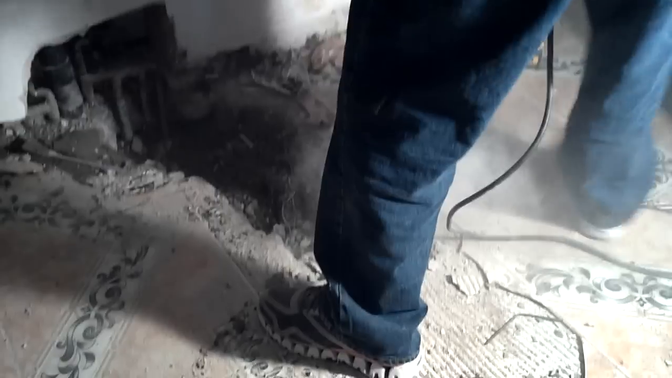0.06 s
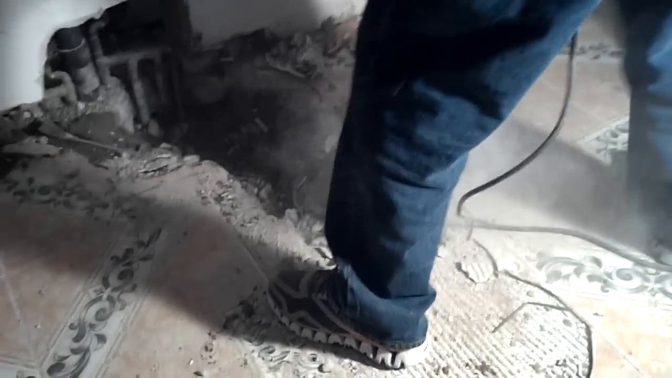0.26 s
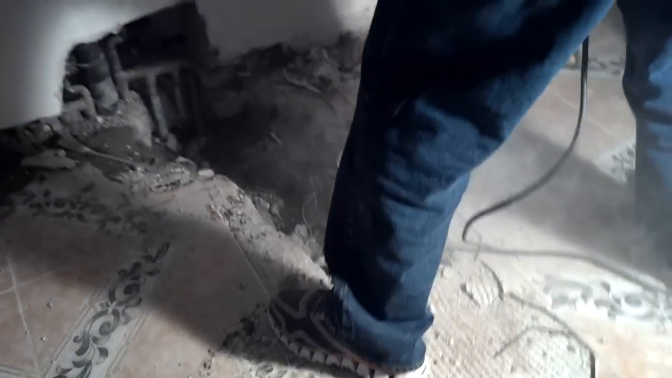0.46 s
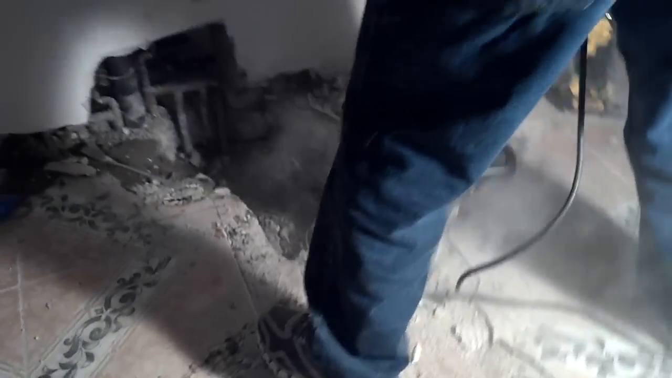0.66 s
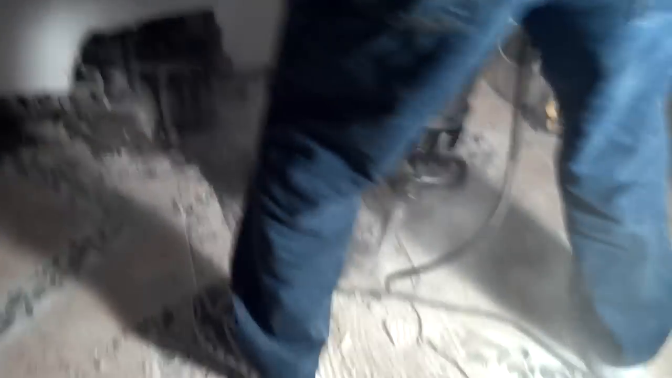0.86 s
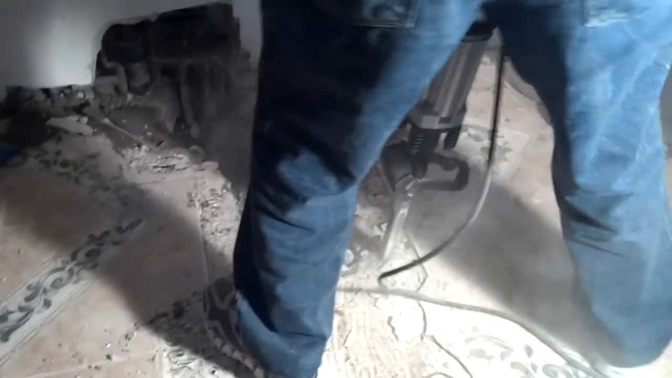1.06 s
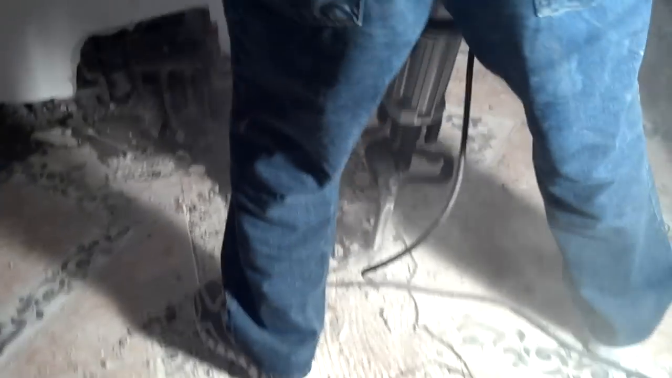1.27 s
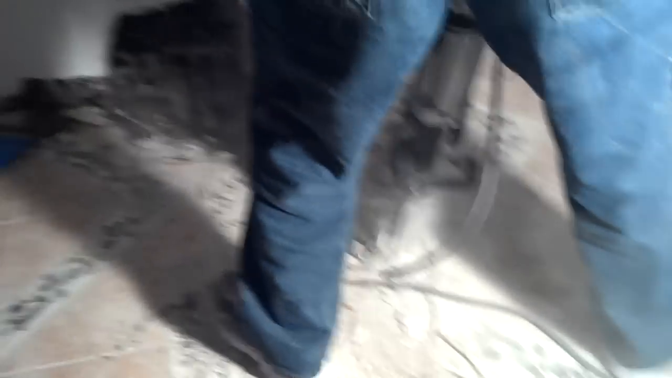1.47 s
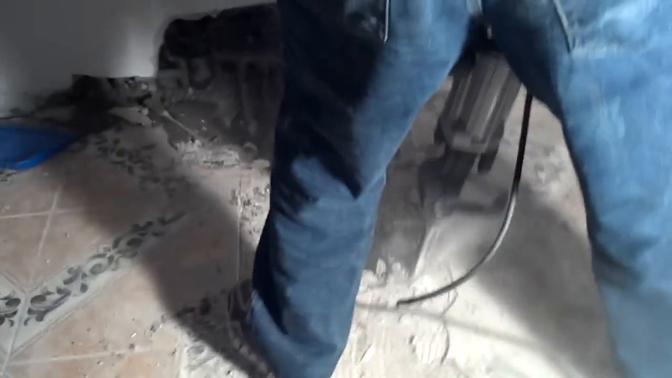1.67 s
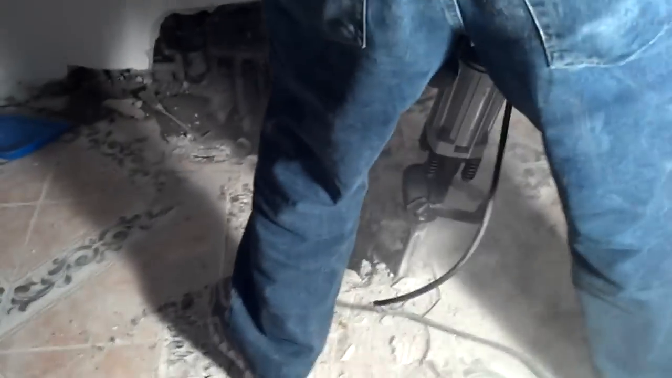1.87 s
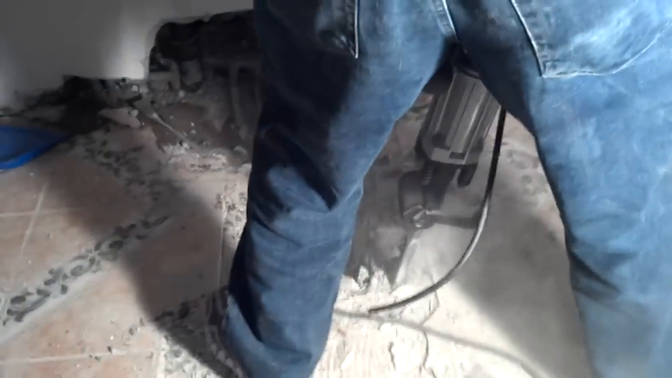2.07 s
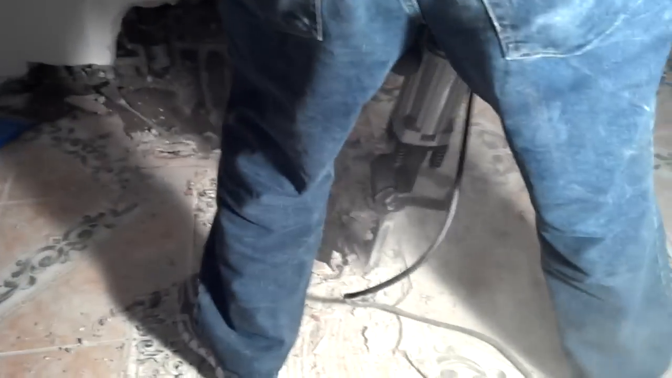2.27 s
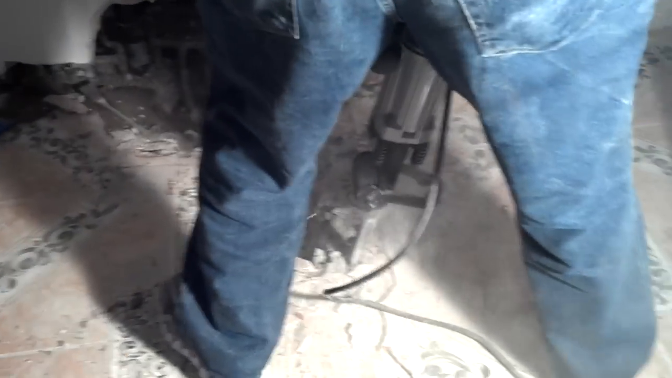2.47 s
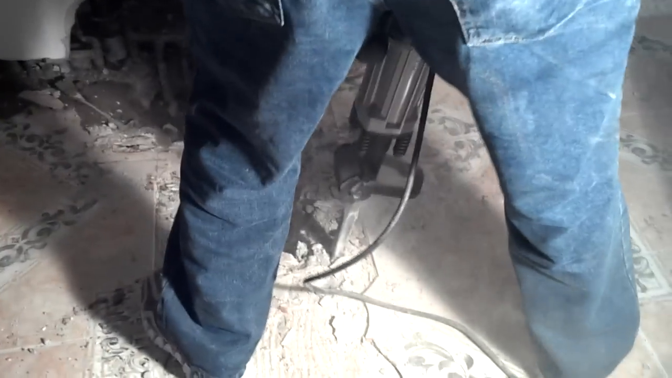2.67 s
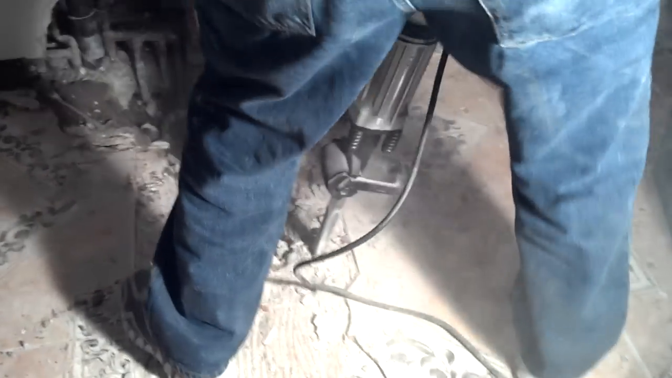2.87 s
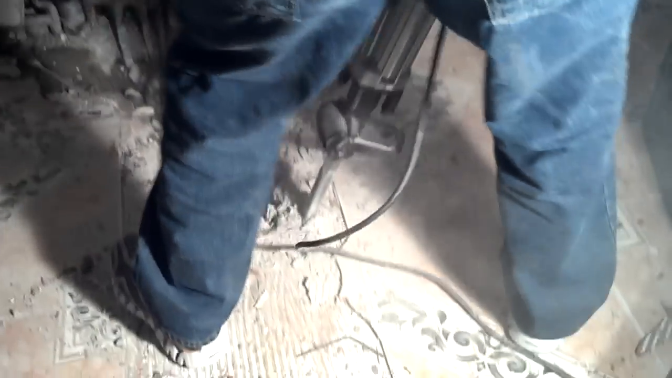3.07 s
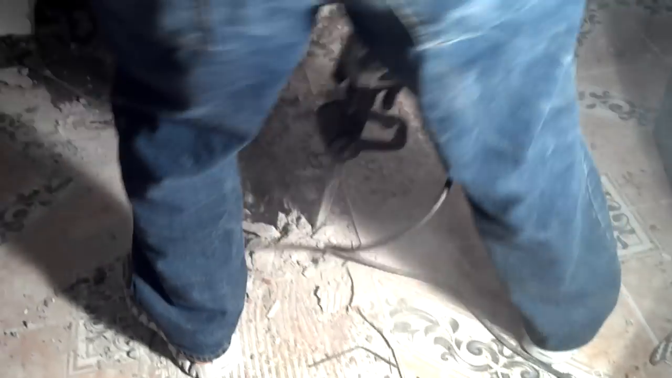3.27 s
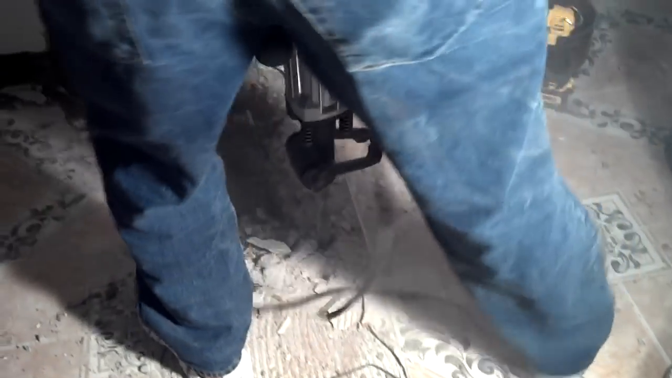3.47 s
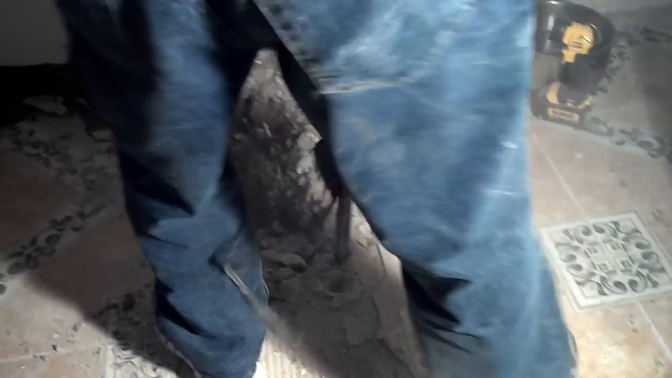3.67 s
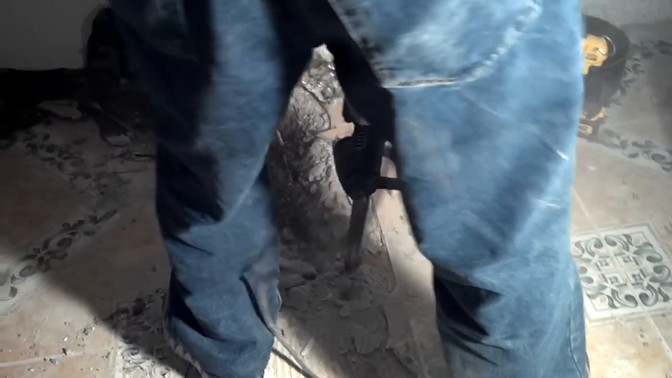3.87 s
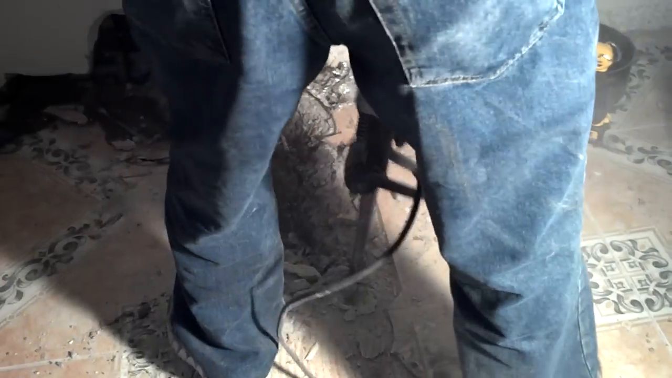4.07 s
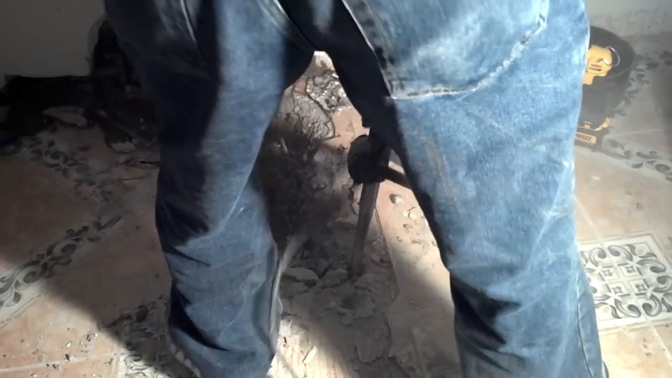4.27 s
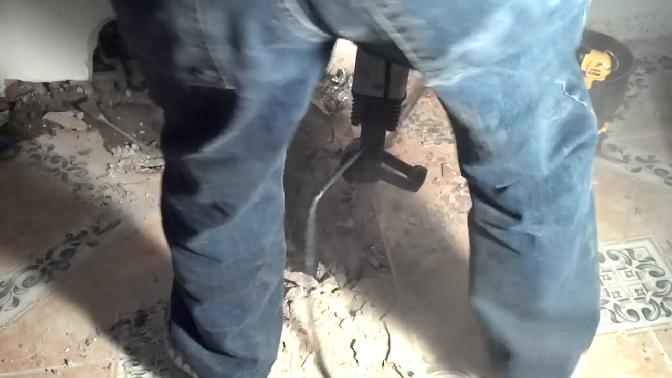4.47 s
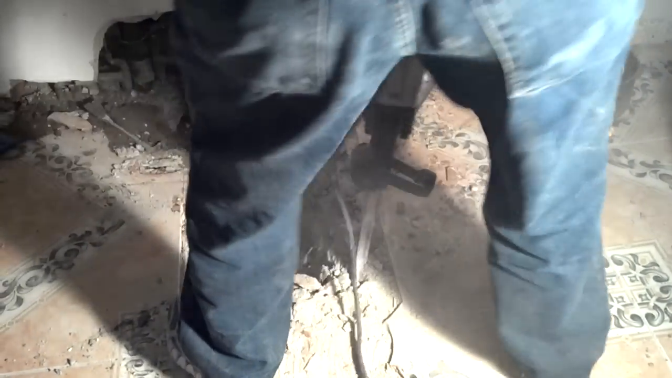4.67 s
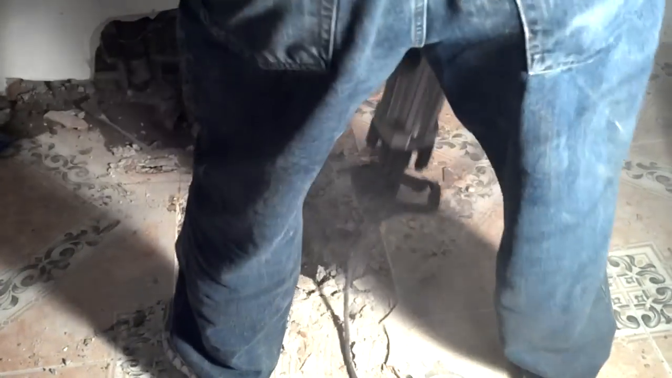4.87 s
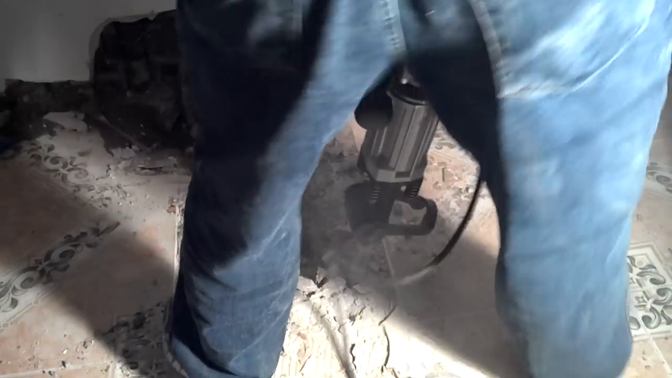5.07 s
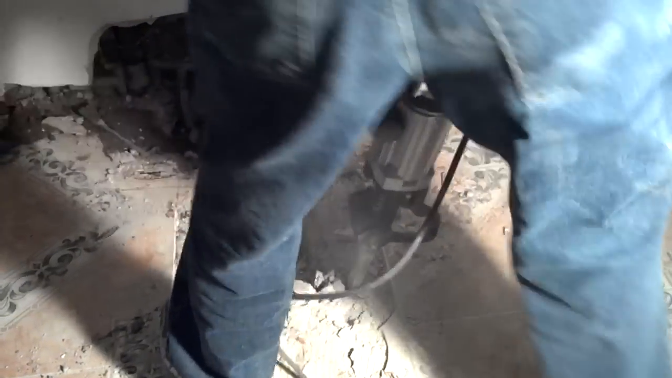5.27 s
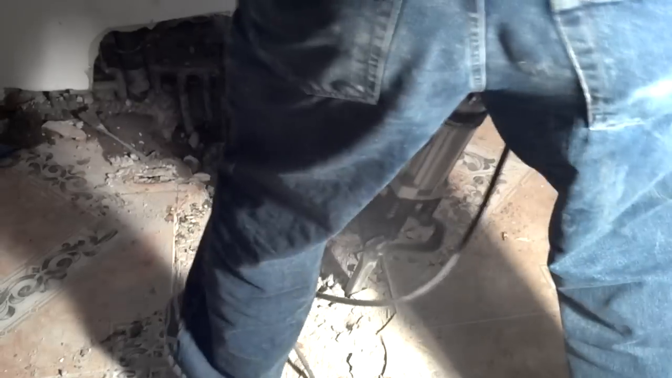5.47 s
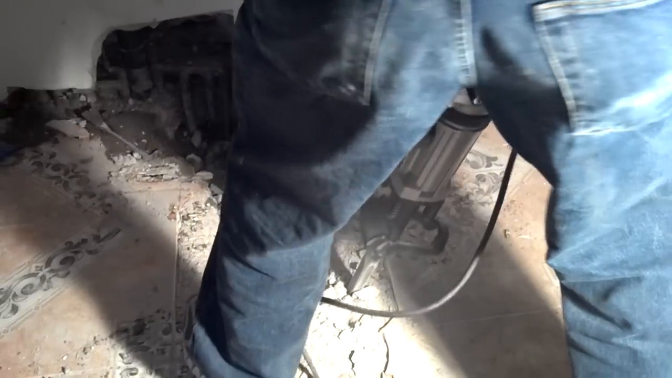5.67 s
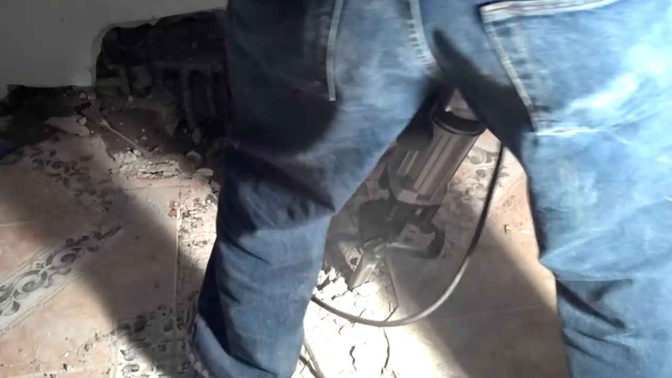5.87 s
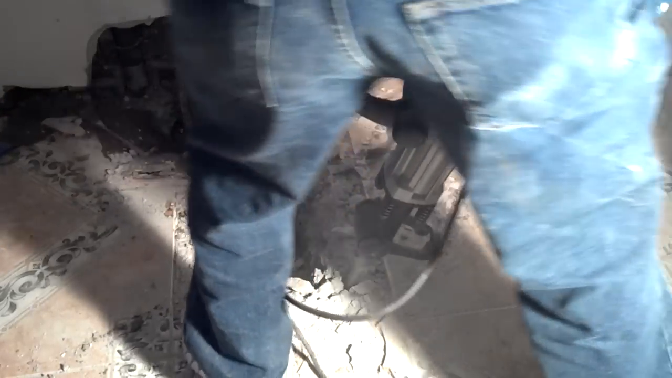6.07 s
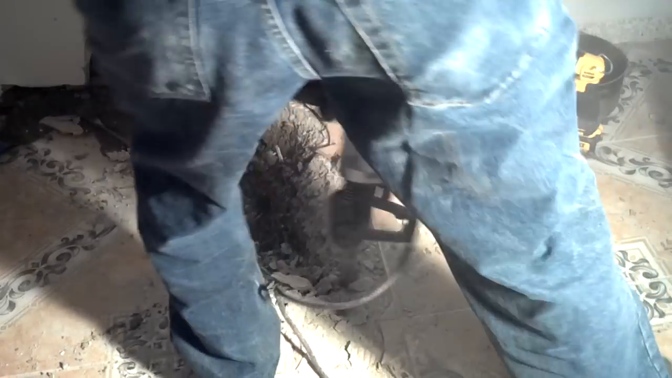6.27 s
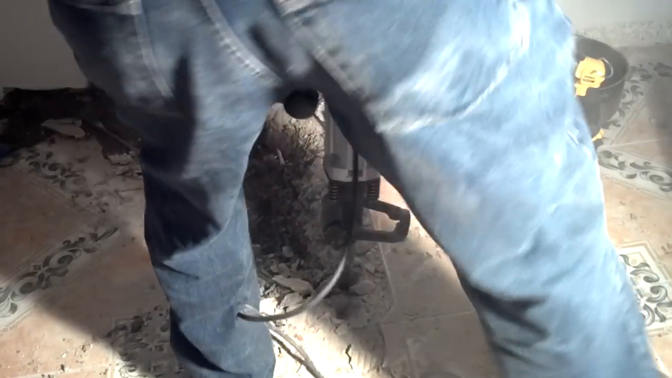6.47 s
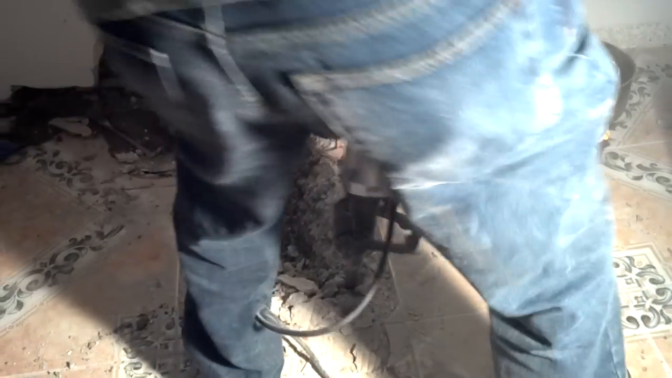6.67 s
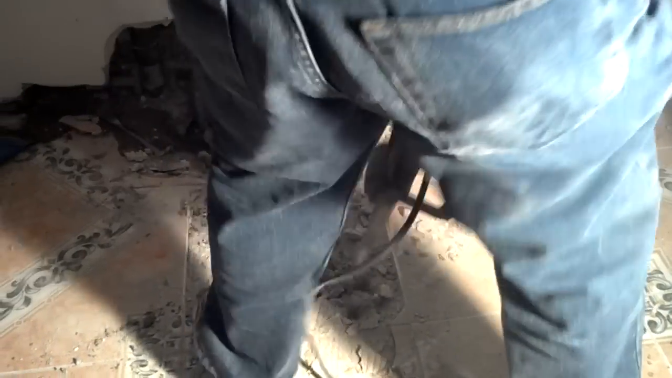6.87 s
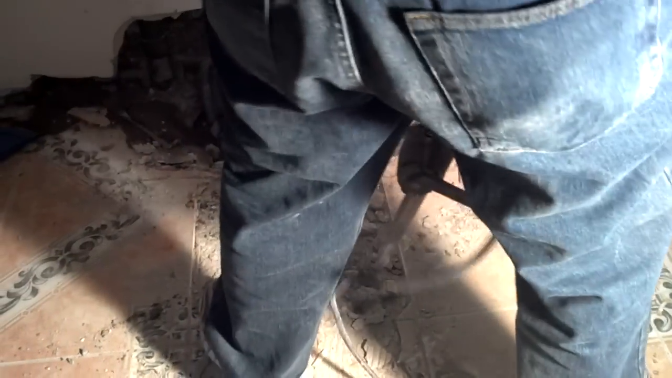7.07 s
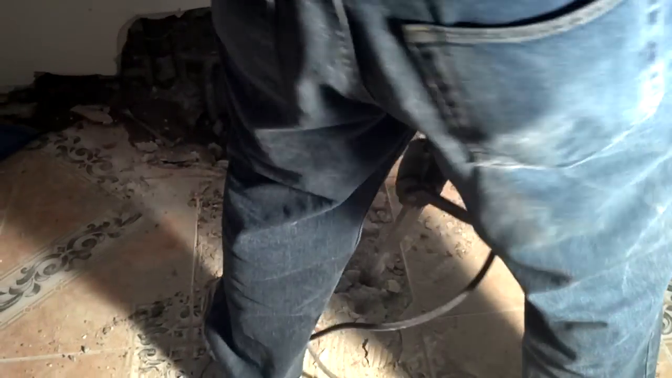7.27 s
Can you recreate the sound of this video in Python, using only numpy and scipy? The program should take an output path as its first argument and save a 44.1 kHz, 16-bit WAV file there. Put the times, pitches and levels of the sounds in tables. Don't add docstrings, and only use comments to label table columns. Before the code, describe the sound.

From the start, a corded electric demolition hammer is already pounding a tiled concrete floor very close by, about 21 to 23 blows a second. Each blow combines a slab thump, a brittle tile crack and a bright steel ring; the chisel skids and sings repeatedly until about 1.75 s, then less often as the blows sit deeper. Fan and brush noise rushes underneath, and bare walls return short, hard echoes. Hammering stops at about 3.5 s, and a thin gear whine climbs over the motor rush. A light blow at 4.2 s leads into renewed hammering from 4.3 s, near 30 blows a second, duller and gritty in rubble, slowing towards 21 with sharper ticks and more rattling steel by 6.1 s. A pause follows, with another rising whine from 6.3 s and scattered knocks between 6.7 and 6.9 s; motor rush continues to about 7.3 s. Low handling bumps jolt the small handheld stereo microphone.

```python
import sys
import numpy as np
from scipy import signal
from scipy.fft import rfft, irfft, next_fast_len
from scipy.io import wavfile
from scipy.ndimage import uniform_filter1d, map_coordinates

SR = 44100
rng = np.random.default_rng(int(sys.argv[2]) if len(sys.argv) > 2 else 0)


def store_wav(level_fs):
    pcm = np.round(np.clip(np.atleast_2d(level_fs), -1, 1) * 32767)
    wavfile.write(sys.argv[1], SR, pcm.T.astype(np.int16))


def how_loud(loudness_db):
    steps = np.asarray(loudness_db, float) / 20
    return 10 ** steps


N = 322792
RUBBLE_S = 4


def along(points, hz):
    f, v = np.transpose(points)
    return np.interp(np.log(hz + 1), np.log(f + 1), v)


def over_time(points):
    return np.interp(np.arange(N) / SR, *np.transpose(points))


def drift(samples):
    return map_coordinates(rng.standard_normal(N // samples + 4), [np.arange(N) / samples])


def unit(x):
    return x / np.sqrt(np.mean(x ** 2) + 1e-20)


def filtered(x, response):
    m = next_fast_len(N + SR // 2)
    return irfft(rfft(x, m) * response(np.fft.rfftfreq(m, 1 / SR)), m)[..., :N]


def peak(f, hz, width):
    return 1j * f * width / (hz * hz - f * f + 1j * f * width)


def modes(table):
    return lambda f: sum((-1) ** k * how_loud(db) * peak(f, hz, w) for k, (hz, w, db) in enumerate(table))


def noise(spectrum):
    return unit(filtered(rng.standard_normal((2, N)), lambda hz: how_loud(along(spectrum, hz))))


def strokes(seconds, db):
    return np.bincount(np.round(seconds * SR).astype(int), how_loud(db), N + SR)[:N]


def fading(x, t60, rise):
    t = np.arange(SR // 2) / SR
    return np.abs(signal.fftconvolve(x, how_loud(-60 * t / t60) * (1 - np.exp(-t / rise)))[:N])


def motor():
    # time in seconds, level in dB.
    rush_level = [(0.0, -22.5), (0.85, -31), (1.65, -29), (2.16, -25), (2.59, -27.5), (2.93, -22),
                  (3.28, -26.5), (3.4, -21), (3.55, -29.5), (3.79, -30.5), (4.18, -27.5), (4.56, -27),
                  (5.5, -26.5), (5.73, -30), (6.03, -28), (6.25, -31.5), (6.71, -27.5), (7.32, -25)]
    # frequency in Hz, level in dB per Hz.
    rush_colour = [(60, -17), (150, -19), (330, 2.5), (600, -3), (1000, -1.5), (1500, -1), (2200, 3),
                   (3500, -2.5), (5200, -11.5), (6300, -9.5), (8500, -12.5), (11000, -22), (14000, -25),
                   (15800, -42)]
    # start in seconds, end in seconds, first pitch in Hz, idle pitch in Hz, level in dB.
    whines = [
        (3.58, 4.6, 3560, 4380, -37.5),
        (6.34, 6.9, 3570, 4280, -36),
    ]
    spin_up_s, rise_s, fade_db_per_s = .33, .07, 8
    t = np.arange(N) / SR
    sound = how_loud(over_time(rush_level) + 0.5 + 1.3 * drift(900)) * noise(rush_colour)
    for start, end, first_hz, idle_hz, db in whines:
        since = np.clip(t - start, 0, None)
        hz = idle_hz - (idle_hz - first_hz) * np.exp(-since / spin_up_s)
        waver = 8 * drift(700)
        swell = (t < end) * (1 - np.exp(-since / rise_s))
        swell = swell * how_loud(db - fade_db_per_s * since + 0.075 * waver)
        phase = 2 * np.pi * np.cumsum(hz + waver) / SR
        sound += swell * np.array([np.sin(phase), .6 * np.cos(phase)])
    return sound


def blows():
    # time in seconds, slab accent in dB,
    # tile accent in dB, steel accent in dB.
    on_tile = [(0.0236, 4, -2, -1), (0.0688, 1.5, -4, -0.5), (0.1129, 2.5, 8, 0), (0.157, 0, -5, -2),
               (0.2021, 3, -3, 1.5), (0.2441, 1.5, -4, 2), (0.2891, 6, 5, -3), (0.334, 3, -4, 0),
               (0.3761, 2.5, 2, 0), (0.422, 4, 1, 3.5), (0.4671, 0, -3, 0.5), (0.513, 1, -1, -3),
               (0.5584, 3, -0.5, -3.5), (0.6049, 3, 1.5, -3.5), (0.6513, -4.0, -0.5, -1.5),
               (0.6993, 2, -1.5, -2), (0.7448, 2.5, -3, -3), (0.7932, 4.5, -1, -3), (0.84, 2.5, -2, -1),
               (0.8864, 4.5, -4.5, -3), (0.9337, 4.5, -2.5, -3), (0.982, 1.5, 0, 2.5),
               (1.0267, 3.5, -4, -1.5), (1.0773, 4, 1.5, -2), (1.1234, 3.5, 1, -1.5),
               (1.1691, 5.5, 1.5, -7), (1.2172, 3, -2, -3), (1.2638, 1, 2.5, 0.5), (1.3113, 3.7, 0.5, -1),
               (1.3567, -0.5, 1.5, 3), (1.4064, 0.5, -1, 3), (1.4509, -3, 1, 2), (1.4961, -1.5, 0, 9.5),
               (1.541, 1, 0.5, -3), (1.5874, 3.5, 4, -3), (1.634, 2.5, 1, 1), (1.6801, 4, 3, -1),
               (1.7281, 2, 2, 0.015), (1.7747, -0.5, 0.5, 0.0012), (1.8223, -0.5, -1, 0),
              (1.8693, 2.5, 0, 0.0028), (1.9149, 0.5, 5.5, 0.016), (1.961, -0.5, 1.5, 0.0067),
              (2.007, 0.7, 1, 0.001), (2.0537, 5, -4, 0.0), (2.0999, 3.5, -2, 0.0041),
              (2.1459, 3, 3.5, 0.0), (2.193, 1.5, -3, 0.016), (2.2403, 0, 1.5, 0.041),
              (2.2867, 0.5, -1, 0.0), (2.3325, 0, -1, 0.0), (2.3783, 5, -1, 0.0031), (2.4255, 3, 0, 0.0053),
              (2.4724, 5, -9, 0.0), (2.5191, -0.5, -2, 0.0026), (2.5658, 1.3, -4.5, 0.0),
              (2.6125, -1.5, -2, 0.0014), (2.6592, 1, -0.5, 0.0026), (2.7059, 1.5, 0.5, 0.0047),
              (2.752, 0.5, 1, 0.0), (2.8004, 1.5, 2.5, 0.011), (2.8462, 1.5, -1, 0.0041),
              (2.8948, -0.5, -5, 0.0), (2.9414, 2.5, -1, 0.0), (2.9897, 1, 0, 0.0076),
              (3.0379, 2, -2.5, 0.0), (3.0848, 2, 0, 0.0), (3.133, 3, -1, 0.012), (3.1808, -1, -3.5, 0.0),
              (3.23, 0, -2, 0.0), (3.2786, 0, -2, 0.0), (3.3284, 7, 2.5, 0.022), (3.378, -9, -2.5, 0.019),
              (3.4286, 6, -7, 0.0053)]
    in_rubble = [(4.2996, -0.0, 0, 0.1), (4.3344, -8, -0.5, 0.3), (4.3706, 2, 2.7, 0),
                 (4.406, -2, -1.5, -3), (4.439, -7, -3, 3), (4.4717, -3, 1, -0.1), (4.5051, 0.5, 3.5, -1),
                 (4.539, 0, 0, 2.2), (4.5727, -1.5, 2, -2), (4.6058, -1.1, 0, -2), (4.6384, 1, -3, -2.3),
                 (4.6717, 0, 0, -4), (4.7056, 1.5, 2, -2), (4.7395, 0, 3.5, -2), (4.7725, 0, 1, 8),
                 (4.8066, -2, 4, -7), (4.8399, -1, 1, 2), (4.8735, -1, 0, 3), (4.9073, -2, 2, 3),
                 (4.9405, -2, 2, 0), (4.9748, -1.5, 2, -2), (5.01, -2, -6, 1), (5.0435, -3, 2.5, -2),
                 (5.08, 0, 4.5, 1.6), (5.1139, -0.5, 3.5, 7), (5.147, -2, 5.5, 4), (5.1817, 4.5, -2.9, 0.5),
                 (5.2151, 3.5, -9, 1), (5.2496, -1.5, -5, 0), (5.2825, 0.5, 4.5, -1), (5.318, 0, -2, -1),
                 (5.3567, 1.5, 3.5, -5), (5.3925, 0.5, 0.5, -2), (5.4321, 0.5, -2, 2), (5.4735, 1, 3, 1.5),
                 (5.5136, 1.3, 2.5, 3), (5.5557, -0.6, 5.5, 1), (5.6004, -1, 0, -1), (5.6477, 0.5, 1.5, 0),
                 (5.6965, -1, -4, 1), (5.7439, 0.5, -1, 0.5), (5.7922, 2, -4, 2), (5.8402, 1.5, 1, 4.5),
                 (5.8896, 0, -1.5, 5), (5.9366, 3, 4, 6), (5.9873, 2, 7.5, 4), (6.035, 2, 5, 5),
                 (6.0833, 3, 6.5, 5), (6.133, 3.5, 7, 6)]
    # time in seconds, bite into the slab in dB, brittleness of the tile in dB, looseness of the steel in dB.
    seats = [
        [(0, -13, -29.5, -25), (.45, -14.5, -20.5, -28), (.75, -18.5, -16, -21.5), (1.15, -19.5, -21, -23),
         (1.45, -10.5, -21.5, -38), (1.9, -13, -23.5, -32), (2.9, -13, -16.5, -36), (3.28, -17.5, -15, -36),
         (3.43, -49, -15.5, -48)],
        [(4.3, -45, -25.5, -47.5), (4.42, -31, -18, -34), (4.52, -28, -20.5, -45), (4.8, -25, -22, -31),
         (5.0, -26, -22.5, -20), (5.15, -20, -21.5, -39), (5.3, -19.5, -18.5, -18.5), (5.75, -20.5, -19, -23),
         (6.13, -26.5, -23, -25.5)],
    ]
    # start in seconds, end in seconds, steel level in dB.
    skids = [(0, .09, -21), (.26, .3, -20), (.32, .4, -20), (.49, .72, -18), (.82, .9, -18.5),
             (.96, 1.05, -22), (1.24, 1.33, -23.5), (1.52, 1.75, -22.5), (1.85, 1.93, -26),
             (2.03, 2.07, -19.5), (2.08, 2.16, -27), (2.36, 2.49, -22.5), (4.96, 5.03, -29),
             (5.16, 5.23, -22)]
    # time in seconds, slab level in dB, tile level in dB, steel level in dB.
    strays = [
        (3.518, -25.5, -16, -67),
        (4.203, -42, -20, -36),
        (6.691, -35, -17.5, -21),
        (6.7237, -25, -21, -29),
        (6.762, -28, -15, -18),
        (6.797, -56, -26, -37),
        (6.856, -26, -27, -52.5),
    ]
    # slab in dB, tile in dB, steel in dB.
    scatter_db = (.4, .4, .6)
    skid_loss = 0.41
    rows = [np.array(strays)]
    for listed, seat in zip((np.array(on_tile), in_rubble), seats):
        s, *accent = np.transpose(listed)
        at, *seated = np.transpose(seat)
        bite, brittle, loose = (np.interp(s, at, v) for v in seated)
        skidding = [np.where((s > start) & (s < end), db, -120) for start, end, db in skids]
        steel = np.max([loose] + skidding, axis=0)
        force = np.array([bite - skid_loss * (steel - loose), brittle, steel]) + accent
        chance = scatter_db * rng.standard_normal((len(s), 3))
        rows.append(np.column_stack([s, force.T + chance]))
    rows = np.concatenate(rows)
    return rows[np.argsort(rows[:, 0])].T


def room_tail():
    # frequency in Hz, time to fall 60 dB in seconds.
    decay = [(150, 0.76), (500, 0.51), (1500, 0.073), (6000, 0.0069)]
    hz, t, z = signal.stft(rng.standard_normal((2, SR // 2)), SR, nperseg=256)
    tail = signal.istft(z * how_loud(-60 * t / along(decay, hz)[:, None]), SR, nperseg=256)[1]
    return tail / np.linalg.norm(tail[0])


def slab(s, db):
    # frequency in Hz, width in Hz, level in dB.
    hard_modes = [(1253, 620, -9.5), (344, 140, 1), (187, 31, 1.5), (540, 108, -7.5)]
    # frequency in Hz, width in Hz, level in dB.
    soft_modes = [(193, 30, 16), (370, 69, 7), (502, 114, 6), (1295, 520, -10), (331, 13.6, 8.5),
                  (600, 40, -1), (121, 18, 9.5)]
    # time in seconds, share 0-1.
    softness = [(0, 0.03), (.6, 0.09), (1.2, 0.03), (3.3, 0.08), (4.3, 0.57), (5.1, 0.46), (5.6, 0.27),
                (6.2, 0.25), (7, 0.16)]
    # frequency in Hz, width in Hz, level in dB.
    ring_modes = [(239, 6.7, -28.5), (315.2, 5.6, 9), (337, 20, 10.5), (400, 36, 1), (564, 61, 2),
                  (720, 16, -6.5), (964, 6.1, 3), (1029, 5.7, 9), (1107, 8.9, -12), (1187, 8.6, 5),
                  (1188, 4.6, -18), (1366, 17, 6.5)]
    # time in seconds, level in dB.
    freedom = [(0, -4), (.6, -14), (1.1, -2.5), (1.8, -3), (2.5, -0.5), (3.1, -6.5), (3.4, 0), (4.5, 1),
               (5.302, -3), (6.2, -5)]
    # delay in seconds, level in dB.
    walls = [(.0045, -30), (.0066, -4.5), (0.0123, -12), (0.0182, -3), (0.0195, -2), (0.023, -19.5),
             (0.0273, -13), (0.033, 0), (0.039, -17)]
    t = np.arange(N) / SR
    push = strokes(s + .0006, db + 40.0)
    soft = over_time(softness)
    airborne = filtered(push, lambda f: (1j * f / (60 + 1j * f)) ** 4)
    hard = filtered(airborne * (1 - soft), modes(hard_modes))
    dull = filtered(airborne * soft, modes(soft_modes)) * how_loud(9.0)
    ringing = filtered(airborne * how_loud(over_time(freedom)), modes(ring_modes))
    delay, loss_db = np.transpose(walls)
    early = signal.fftconvolve(hard + 0.29 * dull, strokes(delay, loss_db)[:SR // 10])[:N]
    spots = [hard * np.clip(1 - np.abs(t / .65 - k), 0, 1) for k in range(8)]
    sources = spots + [.5 * dull]
    late = sum(signal.fftconvolve(x[None], room_tail(), axes=1) for x in sources)
    late = np.pad(late, ((0, 0), (420, 0)))[:, :N]
    floor_borne = filtered(push, lambda f: peak(f, 297, 420) ** 2)
    direct = (1.5 * hard + dull + ringing) * [[1], [.3]]
    direct = direct + 0.51 * early * [[1], [-.4]] + floor_borne * [[0], [2.5]]
    return direct + how_loud(-3.5) * late


def tile(s, db):
    # frequency in Hz, level in dB per Hz.
    crack_colour = [(50, -60), (130, -65), (300, 9.5), (700, -16.5), (1400, -10.5), (2200, 2.5), (3500, -1),
                    (5200, -6.5), (6500, -7), (8500, -9.5), (11000, -12.5), (14000, -13), (15800, -28)]
    # frequency in Hz, width in Hz, level in dB.
    tick_modes = [(4160, 1000, -0.5), (1890, 1000, 0), (6850, 960, -38)]
    # time in seconds, level in dB.
    tick_level = [(0, 16), (1, 11), (2, 11), (3.4, 0), (4.4, 8), (5.1, 29), (5.6, 22), (6.2, 6), (7, 21)]
    hit = strokes(s - 0.0006 * (s > RUBBLE_S), db)
    snap = how_loud(-4) * fading(hit, t60=0.0038, rise=.0001)
    crumble = fading(hit, t60=0.017, rise=0.00075)
    echo_db = -4.5 - 2.5 * (np.arange(N) > RUBBLE_S * SR)
    echo = how_loud(echo_db) * fading(hit, t60=0.29, rise=0.0011)
    grit = how_loud(0.69 * drift(60))
    tick = filtered(strokes(s, db + np.interp(s, *np.transpose(tick_level))), modes(tick_modes))
    return (snap + crumble + echo) * unit(grit) * noise(crack_colour) + tick * [[1], [.6]]


def chisel(s, db):
    # frequency in Hz, width in Hz, level in dB.
    free_steel = [(4520, 90, -6), (6840, 41, -5), (7080, 120, -4), (7290, 90, -2), (9800, 45, -9),
                  (10020, 30, -8), (11490, 85, -15), (12793, 22, -4.5), (13130, 45, -7), (14680, 110, -20)]
    # frequency in Hz, width in Hz, level in dB.
    buried_steel = [(4100, 180, -39), (4780, 130, -12), (7270, 410, -3), (10400, 700, -18),
                    (12500, 1400, -1.5)]
    # time in seconds, level in dB.
    sing = [(0, 2), (.25, -4), (.5, -4), (.75, -5.5), (1.2, -1), (1.3, -5), (1.5, 6), (1.8, 0), (2.1, 2),
            (2.4, -1), (3.4, -7)]
    blow_share, rattle_share = 0.21, 0.75
    t = np.arange(N) / SR
    last = np.clip(np.searchsorted(s, t) - 1, 0, None)
    t60 = np.where(t < RUBBLE_S, 0.43, 0.26)
    fall_db = -60 * np.abs(t - s[last]) / t60
    struck = np.roll(strokes(s, 0 * s), 2)
    ring = np.zeros((2, N))
    for table, now in (free_steel, t < RUBBLE_S), (buried_steel, t > RUBBLE_S):
        for hz, width, level in table:
            narrow_gain = np.sqrt(SR / width)
            level = level + (hz > 12000) * np.interp(s, *np.transpose(sing))
            blow_db = db + level + 2 * rng.standard_normal(len(s))
            envelope = now * how_loud(blow_db[last] + fall_db)
            blow = blow_share * narrow_gain * struck * [[1], [.7]]
            drive = envelope * (rattle_share * rng.standard_normal((2, N)) + blow)
            ring += filtered(drive, lambda f: peak(f, hz, width) * narrow_gain)
    return how_loud(-6.5) * ring


def deep_knocks():
    # time in seconds, peak level in dB, level of the deep part in dB.
    low_knocks = [(0.087, -46, -74), (0.226, -41, -78), (0.297, -60, -65), (0.433, -44, -62), (0.484, -43, -62),
                  (0.577, -46, -76), (0.664, -40, -67), (0.943, -51, -71), (0.978, -37, -71), (1.085, -50, -81),
                  (1.288, -49, -78), (1.433, -52, -81), (1.548, -37, -75), (1.66, -56, -79), (1.828, -37, -63),
                  (2.053, -43, -68), (2.251, -38, -72), (2.331, -36, -62), (2.475, -38, -83), (2.601, -38, -75),
                  (2.703, -43, -68), (2.771, -51, -74), (2.841, -47, -78), (3.034, -34, -69), (3.176, -40, -73),
                  (3.325, -44, -72), (3.372, -39, -70), (3.512, -50, -71), (4.225, -65, -94), (4.338, -59, -85),
                  (4.464, -52, -79), (4.534, -50, -85), (4.592, -49, -78), (4.676, -46, -74), (4.804, -51, -82),
                  (4.939, -46, -76), (5.108, -47, -77), (5.261, -43, -63), (5.448, -55, -69), (5.596, -38, -81),
                  (5.658, -45, -80), (5.786, -54, -85), (5.867, -46, -79), (5.962, -47, -72), (6.032, -53, -72),
                  (6.128, -42, -75), (6.649, -63, -93), (6.759, -54, -72), (6.844, -58, -89), (7.101, -72, -96)]
    s, db, deep_db = np.transpose(low_knocks)
    knock = filtered(strokes(s, db + 56), lambda f: peak(f, 137, 66) ** 2)
    swell_below = filtered(strokes(s, deep_db + 63), lambda f: peak(f, 48, 60) ** 2)
    return knock + swell_below


def scene():
    # frequency in Hz, level in dB.
    port_difference = [(60, 36.5), (200, -10), (350, -15), (700, -10), (1000, -6), (1500, 0), (16000, 0.5)]
    s, thud_db, crack_db, ring_db = blows()
    both, apart = motor() + slab(s, thud_db) + tile(s, crack_db) + chisel(s, ring_db)
    apart = filtered(apart, lambda hz: how_loud(along(port_difference, hz)))
    return how_loud(-2) * np.array([both + apart, both - apart]) * how_loud([[-.5], [.5]])


def roll_off(x):
    return signal.sosfilt(signal.butter(12, 15840, fs=SR, output="sos"), x)


def record(dry):
    lag = 16
    late = np.pad(dry[::-1], ((0, 0), (lag, 0)))[:, :N]
    feed = [(130, 1.01), (300, .96), (1500, .93), (2760, .77),
            (4000, .95), (5500, .98), (8300, .95), (11000, .98)]
    wide = dry - [[.91], [.97]] * filtered(late, lambda hz: along(feed, hz))
    livelier = [(130, -.1), (400, .9)]
    wide = filtered(wide, lambda hz: how_loud(along(livelier, hz) * [[-1], [1]]))

    def valleys(hz):
        comb = np.cos(np.pi * hz * lag / SR) ** 40
        return comb * [(hz > 1400) & (hz < 4100), hz > 4100]

    loudness_db = 10 * np.log10(np.abs(uniform_filter1d(wide[0] ** 2, size=1500)) + 1e-9)
    busy = np.clip((loudness_db + 24) / 6, 0, 1)
    first, higher = filtered(wide.mean(0), valleys)
    flicker = np.clip(1.1 + 1.3 * drift(2500), 0, 1)
    wide = wide - flicker * (.7 * busy * first + (.35 + .45 * busy) * higher)

    wide = filtered(wide, lambda hz: (1j * hz / (120 + 1j * hz)) ** 6)
    wide = wide + deep_knocks()
    wide = wide / (1 + np.abs(wide / .9) ** 6) ** (1 / 6)
    return roll_off(wide)


dry = scene()
out = record(dry)
store_wav(out)
```